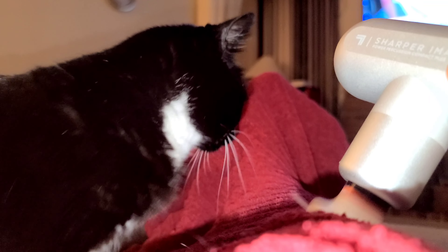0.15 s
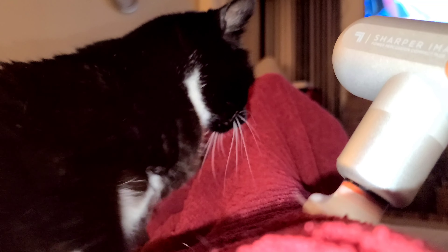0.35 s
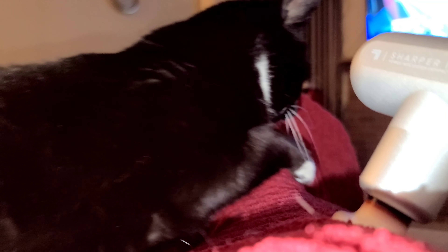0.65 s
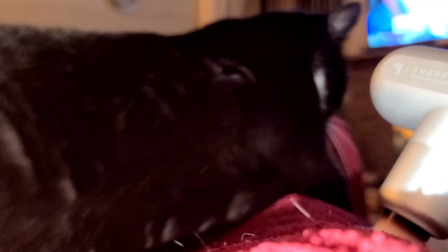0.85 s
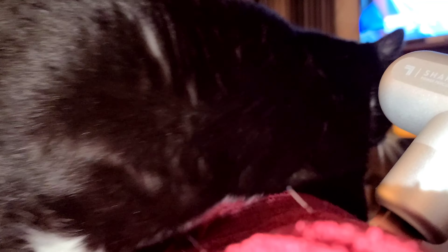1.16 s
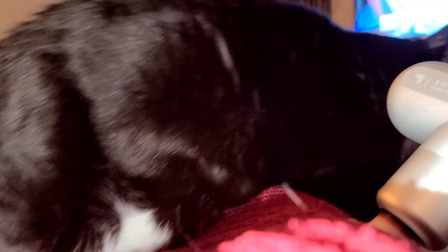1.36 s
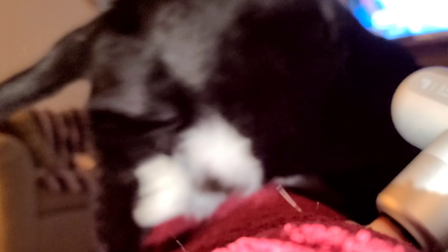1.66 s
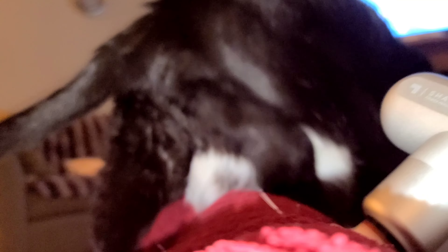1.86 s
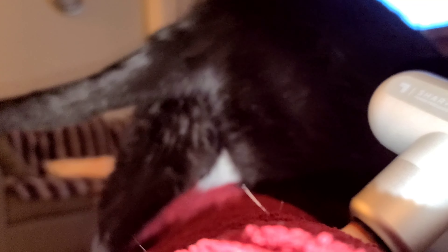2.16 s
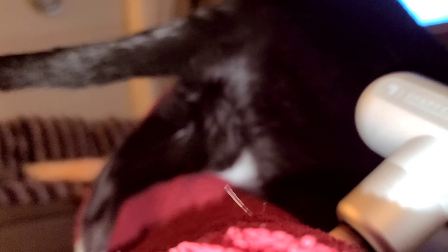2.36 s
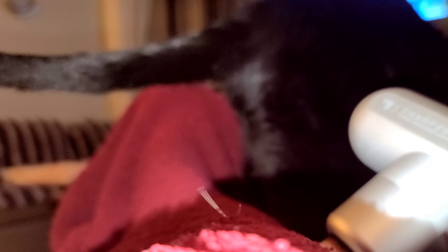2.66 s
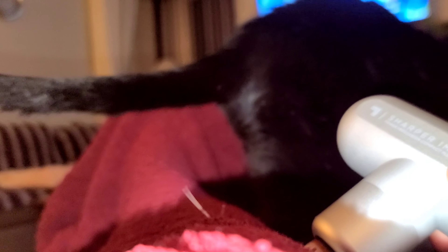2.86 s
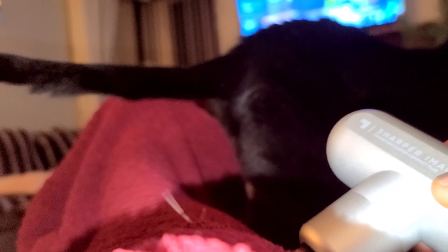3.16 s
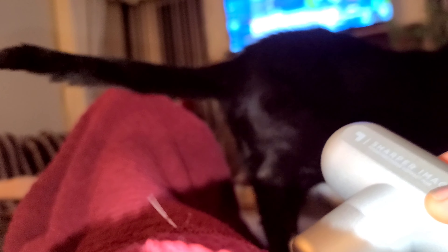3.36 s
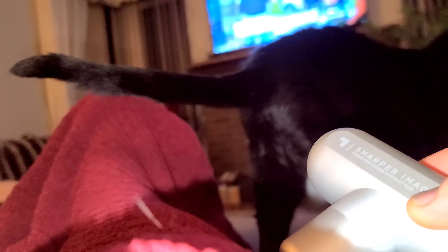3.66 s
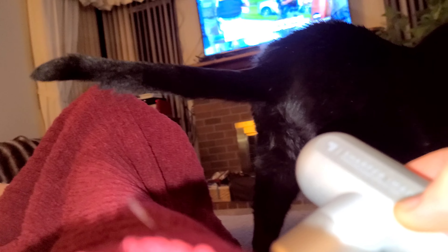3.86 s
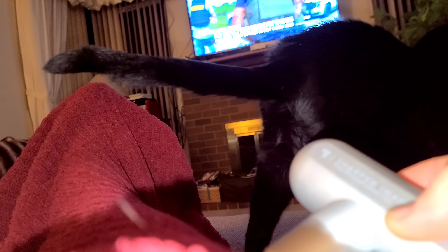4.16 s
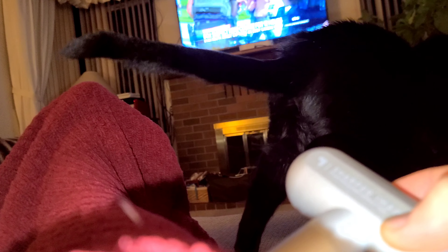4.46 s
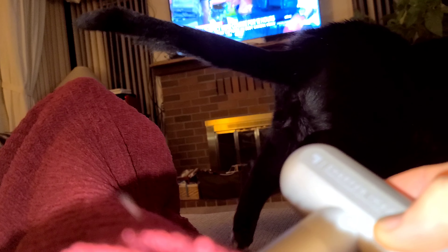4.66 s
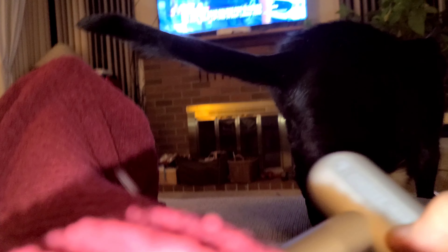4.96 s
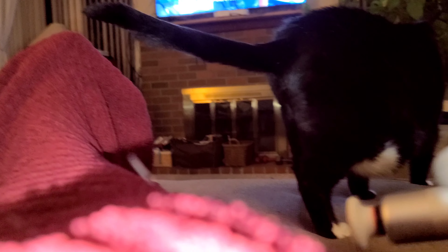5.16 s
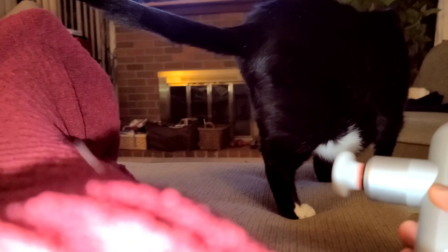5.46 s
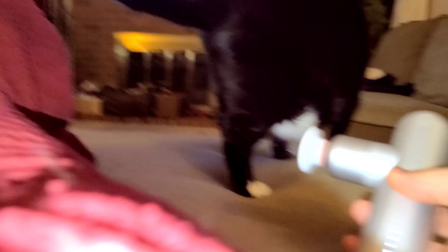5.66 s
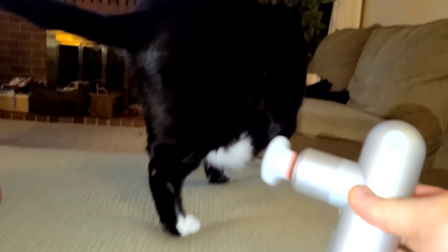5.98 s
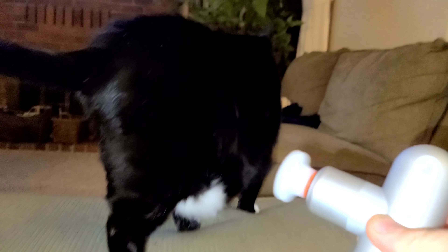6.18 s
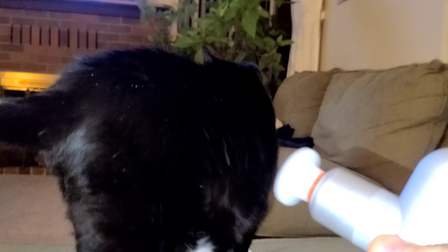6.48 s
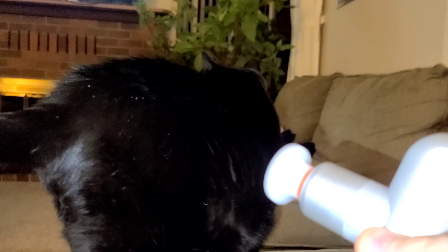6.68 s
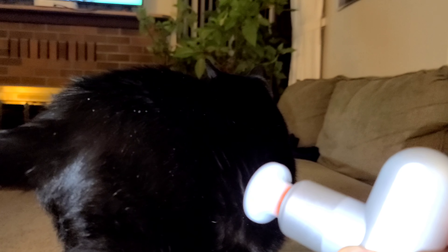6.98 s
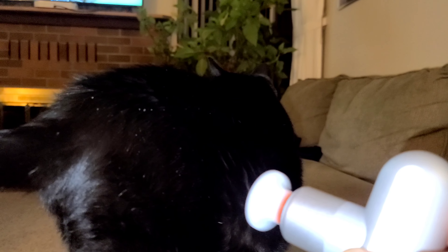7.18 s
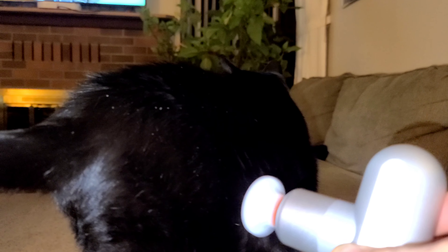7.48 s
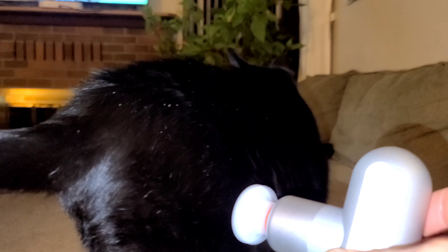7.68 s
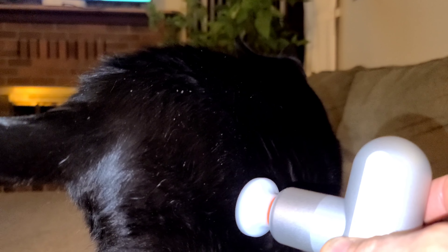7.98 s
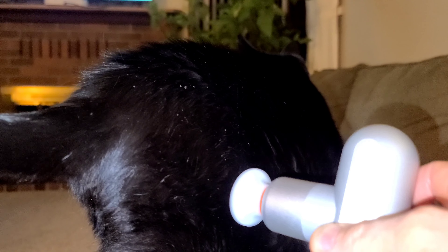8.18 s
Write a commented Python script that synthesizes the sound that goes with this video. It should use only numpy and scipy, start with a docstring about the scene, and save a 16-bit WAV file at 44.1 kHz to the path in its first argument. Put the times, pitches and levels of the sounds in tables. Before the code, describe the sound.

Close motor drone of a massage gun pressed on a blanketed leg, knocking and buzzing, then running freer and slightly higher after lifting, with clicks.

```python
"""Massage gun, pressed and lifted

A massage gun runs close to the microphones in a living room, on a blanket-covered leg, then lifts towards a cat.
Crank-locked tones and struck modes make its drone and knocks, 47 to 50 strokes a second; the motor's buzz and
rasp are coloured noise that repeats each turn, its whine a stack of tones. It runs faster once free.
Filtered noise is the rustling cloth and quiet room; struck modes give a sharp click and dull handling ticks."""
import sys
import numpy as np
from scipy import signal
from scipy.fft import rfft, irfft, next_fast_len
from scipy.io import wavfile

SR = 44100
rng = np.random.default_rng(int(sys.argv[2]) if len(sys.argv) > 2 else 0)


def materialize(psi):
    """Save the field psi as 16-bit PCM at rate SR to the path in sys.argv[1].

    A 1-D psi becomes a single channel; in a 2-D psi each row is a channel.
    """
    bounded = np.clip(np.atleast_2d(psi).T, -1, 1)
    quanta = np.round(bounded * 32767).astype(np.int16)
    wavfile.write(sys.argv[1], SR, quanta)


N = 367353
TIME = np.arange(N) / SR

# motor speed, which sags under load: time_s, strokes_per_s
SPEED = [(0, 48.329), (0.72, 48.757), (0.92, 47.526), (1.25, 46.616), (1.8, 47.262), (2.2, 46.95),
         (2.75, 47.661), (4.98, 47.13), (5.1, 49.7), (5.2, 50.276), (8.33, 50.333)]
FREE_STROKES_PER_S = 50.33
FULL_LOAD_SAG_PER_S = 2.865   # strokes per s lost when the head is fully pressed down

# spells of the grip: start_s, end_s, attack_s, release_s
THROB = (0, 0.674, .05, 0.295)   # the loosely held gun shakes the leg
TIPPED = (4.31, 5.02, 0.963, 0.0145)   # tipped on to the edge of its head
STRAIN = (4.25, 4.61, 0.067, 0.116)   # the bearing is loaded sideways
LOOSE = (0.157, 0.888, 0.079, 0.053)   # the head is not yet seated
LIFTED = (5.1, 5.784, 0.037, 0.234)   # just lifted, the free piston clacks harder
SING = (2.147, 4.68, 0.083, 0.047)   # the shell's ringing shifts to its highest band

# near-field stroke tone at the two microphones: time_s, left_db, right_db, left_lag_turns
DRONE = [(0.0, -36.1, -33.9, 0.14), (0.7, -38.4, -35.1, 0.13), (1.4, -37.9, -33.5, 0.37),
         (2.5, -39.2, -34.4, 0.38), (3.5, -39.3, -39.0, 0.14), (4.9, -34.3, -39.4, 0.23),
         (5.15, -41.3, -38.5, 0.04), (5.7, -45.7, -41.1, 0.04), (6.6, -41.5, -39.7, -0.0),
         (8.33, -40.6, -36.1, -0.03)]
# low overtones of the stroke: time_s, second_db, third_db, fifth_db, left_minus_right_db
OVERTONES = [(0, -44, -47.5, -63.5, -7.5), (.58, -42.5, -53, -55.5, -12), (.88, -59.5, -60.5, -62.5, 0.5),
             (1.05, -53.5, -52, -59, -8), (1.3, -50.5, -52, -59.5, 2), (1.75, -48.5, -55, -61.5, 3),
             (2.15, -58, -54, -64.5, 7), (2.45, -51.5, -54.5, -65.5, 2), (3.05, -54.5, -53, -61, -9),
             (3.5, -56, -60, -74.5, -6), (3.85, -63, -63.5, -85.5, -16), (4.25, -56.5, -61, -85.5, -18.5),
             (4.85, -53.5, -67.5, -83.5, -20.5), (5.15, -60, -54, -66.5, -5),
             (6.3, -61.5, -57.5, -87.5, -4.5), (8.33, -57.5, -56.5, -72.5, -1)]
# fourth overtone, the body of the hum: time_s, level_db
FOURTH = [(0, -64.5), (1.1, -67), (2.1, -66.5), (2.55, -57.5), (3.15, -62.5), (3.8, -75.5), (4.9, -82.5),
          (5.2, -73.5), (8.33, -78)]
OVERTONE_WAVER_DB = 1.8   # under full load

# head bouncing on every second stroke, gently and then hard: start_s, end_s, level_db
BOUNCES = [(0, .29, -36), (.38, 0.567, -24.5), (.62, .63, -22.5)]
BOUNCE_EDGES_S = (0.085, 0.014)   # attack, release; likewise for the other edges
BOUNCE_CRACK_DB = -21.5   # the casing's slap in each bounce
# resonances of a bounce: mode_hz, level_db, t60_s
BOUNCE_MODES = [(73.9, -7, 0.162), (133, -3, 0.0117), (416, -1.5, 0.00582), (770, -6, 0.00684),
                (1240, -6, 0.00188)]
# loose head chattering once a stroke while it runs free: start_s, end_s, level_db
CHATTERS = [(6.3, 6.7, -51), (6.77, 7.02, -44), (7.1, 8.33, -48)]
CHATTER_EDGES_S = (.05, 0.061)
# resonances of the chattering head: mode_hz, level_db, t60_s
CHATTER_MODES = [(1170, -3, 0.017), (1324, 0.5, 0.0121)]
# piston knocking under load: start_s, end_s, level_db
KNOCKS = [(1.5, 1.68, -33), (2.03, 2.14, -32), (2.25, 2.48, -32.5)]
KNOCK_EDGES_S = (0.268, 0.452)
# how squarely the knock lands, which makes it bright: time_s, hardness_0_to_1
HARDNESS = [(1.2, 0.65), (1.5, 0.92), (1.78, 0.52), (2.08, 0.91), (2.3, 0.79), (2.7, 0.47)]
# resonances of the piston knock: mode_hz, level_db, t60_s
PISTON_MODES = [(224.6, -11, 0.0278), (392, -1.5, 0.01742), (528, -1.12, 0.01098), (864, -0.5, 0.00853),
                (1140, -4.5, 0.0039)]
# resonances of the end-of-travel clack: mode_hz, level_db, t60_s
CLACK_MODES = [(244.1, -6.5, 0.0489), (377.7, 2, 0.01318), (564, 1, 0.00863), (865.5, -9, 0.0148)]

# Pairs are (running free, full load) in dB; the other levels are what each grip spell adds.
CLACK_DB, CLACK_THROB_DB, CLACK_TIPPED_DB, CLACK_LIFTED_DB = (-53.5, -47.5), 11.5, -16, 6.5
BUZZ_DB, BUZZ_THROB_DB, BUZZ_TIPPED_DB = (-69, -61.5), 6.5, 1
RASP_DB, RASP_STRAIN_DB, RASP_SING_DB = (-63, -61), 5.5, -2.5
LOW_RING_DB, LOW_RING_STRAIN_DB, LOW_RING_THROB_DB, LOW_RING_SING_DB = (-72, -64.5), 6.5, -6.5, -1.5
LOW_RING_TIPPED_DB = -3
MIDDLE_RING_DB, MIDDLE_RING_TIPPED_DB, MIDDLE_RING_THROB_DB = (-79, -63.5), -11, -3
HIGH_RING_DB, HIGH_RING_SING_DB = (-75.5, -68.5), 5
LOW_RING_WAVER_DB = 1.3
LOW_RING_PULSING = .12   # depth of the swell in the low ring, twice a turn
FREE_RASP_FOLLOWS = 0.58   # share of the whine's turning that rasp, low and high ring follow when free
# tone of the drive's buzz: band_hz, relative_level_db
BUZZ = [(150, -5.5), (330, 4), (450, -3), (620, -2), (800, -3), (1080, -9), (1340, 3), (1650, -21),
        (2400, -29)]
# tone of the rasp under load: band_hz, relative_level_db
RASP_LOADED = [(1600, -15), (2400, -27.5), (3300, -10), (3750, 10), (4000, 4.5), (4230, 10.5), (4480, 0),
               (4720, 7.5), (5400, -7.5), (6300, -6.5), (6850, -15), (9500, -45.5), (12500, -5.5),
               (16000, -19.5)]
# tone of the rasp running free: band_hz, relative_level_db
RASP_FREE = [(1600, 6.5), (2400, 4), (2900, 16), (3500, 5), (3900, 15), (4250, -0.5), (5200, 6.5),
             (6000, 3), (6800, -9.5), (8000, 4.5), (9800, -22.5), (12500, -1), (16000, -28.5)]

# motor tones: multiple_of_stroke_rate, loaded_relative_db, free_relative_db
WHINE = [(7, -16, -2), (9, -18, -5), (11, -20, -7), (13, -20, -10), (15, -20, -14), (17, -12, -14),
         (19, -18, -15), (20, -1.5, -12), (21, -7, -16), (24, -24, -12), (25, -26, -10), (28, -22, -12),
         (29, -11, -24), (30, 2.3, 2.5), (31, -4, -22), (59, -11, -26), (60, -14, -14), (61, -13, -30),
         (75, -28, -11), (80, -21, -12), (89, -13, -34), (90, -16, -23), (91, -16, -36), (99, -15, -32),
         (120, -20, -30), (150, -24, -14)]
# whine level as the gun turns towards the microphones and away: time_s, relative_level_db
FACING = [(0, -3.5), (0.7, -6), (1.2, -9), (2.3, -6.5), (2.8, -2), (4.0, -4.5), (5.0, -4), (5.09, -1),
          (5.17, -4.5), (5.35, -13.5), (5.9, -7.5), (6.2, -1.5), (8.33, -2.5)]
WHINE_DB = -60   # reference for the two relative levels above
LOOSE_ORDER, LOOSE_DB = 20, 8   # the tone that swells while the head is not seated, and its lift

# head scuffing the blanket on each stroke: start_s, end_s, level_db
SCUFFS = [(0, .75, -55), (.9, 2.6, -61), (2.7, 4.7, -64.5), (5.12, 5.16, -61.5)]
SCUFF_EDGES_S = (0.024, 0.208)
SCUFF_SHARPNESS = 0.39   # how narrowly each scuff is bunched within the stroke
# tone of the scuff: band_hz, relative_level_db
SCUFF = [(1500, -3), (3200, -2), (4600, 6), (6600, 2.5), (7800, 0.5), (9500, -6.5), (12000, -1.5),
         (16000, -7.5)]
# sliding cloth: start_s, end_s, level_db
SLIDES = [(5.52, 5.57, -52), (5.73, 5.77, -50.5), (5.97, 6.17, -54.5)]
SLIDE_EDGES_S = (0.1015, 0.0288)
SLIDE_FLUTTER_DB = 1.8
# tone of the sliding cloth: band_hz, relative_level_db
CLOTH = [(60, 2.5), (150, 3), (300, 6.5), (565, 2), (1200, -1), (1800, -4.5), (2800, -4.5), (4900, -12.5),
         (5900, -11.5), (12000, -21), (16000, -24.5)]
# the weave catches and rubs: start_s, end_s, attack_s, release_s
RUB = (5.925, 6.15, 0.064, 0.0087)
RUB_DB, RUB_CATCHES_PER_S = -53.5, 3300
# tone of the grainy rub: band_hz, relative_level_db
RUB_SPECTRUM = [(300, -7), (1200, -4), (2100, -3.5), (2800, 5), (3400, -0.5), (4900, -7), (5900, -5),
                (8000, -10), (12000, -16), (16000, -20)]

# head cracking down, then slipping and slapping on every stroke: time_s, level_db, contact_hz
SLAPS = [(.6618, -26, 2600), (.6642, -35, 1900), (.6826, -35, 1650), (.7030, -30, 1800),
         (.7235, -29.5, 1800), (.7440, -31.5, 1800), (.7646, -32, 1600), (.7853, -33.5, 1500),
         (.8059, -35, 1500), (.8267, -37, 1400), (.8476, -43, 1300)]
# resonances of the casing's slap: mode_hz, level_db, t60_s
SLAP_MODES = [(501, -1.5, 0.0119), (890, 1.8, 0.00723), (1281, -1.545, 0.0123)]
# soft bumps on the leg: time_s, level_db, contact_hz
BUMPS = [(4.02, -41, 200), (5.075, -33, 263), (5.68, -28.5, 263), (5.803, -28.5, 265.3)]
# touches that land on a hard edge: time_s, level_db, contact_hz
EDGES = [(5.412, -40, 12000), (5.8407, -31, 12000), (6.243, -44, 12000), (6.7493, -46, 12000),
         (7.5024, -45.5, 12000), (7.767, -44.5, 12000)]
# resonances of that hard edge: mode_hz, level_db, t60_s
EDGE_MODES = [(4490, -4.5, 0.0038), (6800, -13.5, 0.00175), (12000, -10, 0.00103)]

# sharp click: time_s, level_db, contact_hz
CLICK = [(5.8406, -15, 4700)]
# click resonances, unequal at the two microphones: mode_hz, level_db, t60_s, left_minus_right_db
CLICK_MODES = [(217, 0, 0.00686, -9.5), (535, -13, 0.0357, -10), (1076, -1, 0.00743, 5),
               (1803, -5.5, 0.00597, 7), (2320, -22.5, 0.0039, 9), (3017, -2.5, 0.00714, 11),
               (3834, -6.5, 0.00282, 11)]
# dull handling ticks: time_s, relative_level_db, contact_hz
TICKS = [(1.502, -43, 2000), (2.863, -42.5, 2000), (2.884, -38.5, 2520), (5.412, -37, 3000),
         (5.437, -43.5, 3000), (5.801, -32, 3000), (5.881, -40.5, 2500), (6.061, -38, 1200),
         (6.7493, -22, 3500), (7.0392, -23, 2200), (7.5021, -22, 3900), (7.5974, -26, 2400),
         (7.9026, -23.5, 2300), (8.315, -37, 1500)]
# tick resonances, unequal at the two microphones: mode_hz, level_db, t60_s, left_minus_right_db
TICK_MODES = [(272, -12.5, 0.0175, 3.5), (415.6, 3, 0.0152, 3), (531, 2, 0.0134, 8),
              (647, -16, 0.0088, 6.5), (737, -7, 0.0166, 7.5), (1036, -6.5, 0.0095, 6),
              (1500, -30, 0.005, 6), (2283, -7, 0.00464, 10.5)]
# small squeak of the grip: time_s, length_s, pitch_hz, level_db
SQUEAK = (6.953, .004, 1660, -53)

# tone of the quiet room: band_hz, relative_level_db
ROOM = [(20, -22.5), (45, 8), (70, 5.5), (120, -3.5), (250, -11.5), (600, -13), (1500, -17.5), (4000, -39),
        (16000, -34)]
# faint steady tone, fading out after five seconds: start_s, end_s, attack_s, release_s
ROOM_TONE = (0.5, 5, .1, 0.06)
ROOM_TONE_HZ, ROOM_TONE_DB = 588, -71.5
CUTOFF_HZ = 15900


def from_db(db):
    """Decibels to gain."""
    return 10 ** (np.asarray(db) / 20)


def rms_one(x):
    """Scale to unit rms."""
    return x / np.sqrt(np.mean(x ** 2) + 1e-20)


def in_time(rows):
    """Each column of a curve, interpolated at every sample."""
    s, *columns = np.transpose(rows)
    return [np.interp(TIME, s, column) for column in columns]


def spell(start, end, attack, release):
    """Swells to 1 at the start, holds, and dies away after the end."""
    rise = np.minimum(TIME - start, 0) / attack
    fall = np.maximum(TIME - end, 0) / release
    return np.exp(rise - fall)


def spells(rows, edges):
    """The gain of a run of spells that share their attack and release."""
    return np.max([from_db(db) * spell(start, end, *edges) for start, end, db in rows], axis=0)


def under_load(levels_db, load):
    """A level in dB between its free and its fully loaded value."""
    free_db, loaded_db = levels_db
    return free_db + load * (loaded_db - free_db)


def colour(x, spectrum):
    """Shape a sound by a spectrum that is shut beyond its ends; rms 1."""
    hz, db = np.transpose(spectrum)
    size = next_fast_len(N)
    log_hz = np.log(np.arange(size // 2 + 1) * SR / size + 1e-9)
    gain = from_db(np.interp(log_hz, np.log(hz), db, left=-200, right=-200))
    return rms_one(irfft(rfft(x, size) * gain, size)[..., :N])


def drift(rate_hz):
    """Slow random wander of rms 1: noise at 200 points a second through a two-pole smoother."""
    noise = rng.standard_normal(int(TIME[-1] * 200) + 400)
    r = np.exp(-2 * np.pi * rate_hz / 200)
    slow = signal.lfilter([1], [1, -2 * r, r * r], noise)[398:]   # drop the settling
    return np.interp(TIME * 200, np.arange(len(slow)), rms_one(slow))


def pan(db):
    """Left and right gains for a left-minus-right level difference."""
    return from_db(np.array([[.5], [-.5]]) * db)


def spread(pair, alike):
    """Two unrelated signals as left and right with a given likeness."""
    alike = np.clip(alike, -1, 1)
    middle = np.sqrt((1 + alike) / 2) * pair[0]
    side = np.sqrt((1 - alike) / 2) * pair[1]
    return middle + side * np.array([[1], [-1]])


def ports(x, side_db, lag_s):
    """A source at the two microphones: louder on one side; a positive lag is later on the right."""
    return np.array([x, np.interp(TIME - lag_s, TIME, x)]) * pan(side_db)


def ring(clicks, modes, contact_hz):
    """Clicks, softened by the contact, set damped sines ringing with alternating signs."""
    force = signal.sosfilt(signal.butter(4, contact_hz, fs=SR, output="sos"), clicks + 1e-18)
    out = 0
    for k, (hz, db, t60) in enumerate(modes):
        r = np.exp(-np.log(1000) / (t60 * SR))
        w = 2 * np.pi * hz / SR
        mode = signal.lfilter([0, np.sin(w)], [1, -2 * r * np.cos(w), r * r], force)
        out = out + (-1) ** k * from_db(db) * mode
    return out


def taps(events, modes, lowest_hz):
    """Single touches, each as hard as its contact, that ring briefly, with the lows cut below lowest_hz."""
    out = np.zeros(N + SR)
    click = signal.unit_impulse(SR // 4)
    low_cut = signal.butter(2, lowest_hz, "high", fs=SR, output="sos")
    for s, db, contact_hz in events:
        at = round(s * SR)
        touch = ring(click, modes, min(contact_hz, .45 * SR))
        out[at:at + len(click)] += from_db(db) * signal.sosfilt(low_cut, touch)
    return out[:N]


def resonate(x, hz, width_hz):
    """A steep-sided resonance, one peak filter run twice; rms 1."""
    b, a = signal.iirpeak(hz, hz / width_hz, fs=SR)
    return rms_one(signal.lfilter(b, a, signal.lfilter(b, a, x)))


def strokes(turn, angle, uneven_db):
    """One click of uneven strength each time the crank passes an angle (in turns)."""
    at = np.flatnonzero(np.diff(np.floor(turn - angle)) > 0)
    clicks = np.zeros(N)
    clicks[at] = from_db(uneven_db * rng.standard_normal(len(at)))
    return clicks


def rubbing(turn, rough, size=4096):
    """Moving parts meet the same bumps on every turn; a share of the friction is new each time."""
    bumps = rng.standard_normal((4, size // 12))
    tracks = signal.resample(bumps, size, axis=1)[:, (turn % 1 * size).astype(int)]
    grip = drift(0.3006) * 1.174   # radians: the changing grip shifts which parts radiate
    repeating = rms_one(tracks[:2] * np.cos(grip) + tracks[2:] * np.sin(grip))
    rough = np.clip(rough, 0, 1)
    return np.sqrt(1 - rough) * repeating + np.sqrt(rough) * rng.standard_normal((2, N))


def drone(turn, load):
    """The shuttling mass gives a clean stroke tone; its low overtones swell and fade with the grip."""
    left_db, right_db, left_lag = in_time(DRONE)
    second_db, third_db, fifth_db, side_db = in_time(OVERTONES)
    fourth_db, = in_time(FOURTH)
    throb = spell(*THROB)
    swing = turn - .05 + .04 * throb   # the mass lags the crank, less so when loosely held
    crank = 2 * np.pi * (swing - np.array([[1], [0]]) * left_lag)
    tone = from_db([left_db, right_db]) * np.cos(crank)
    yielding = .06 * load - .035 - .04 * throb   # turns: the soft leg delays the push
    push = 2 * np.pi * (turn - yielding - np.array([[.3], [0]]) * left_lag)
    overtones = 0
    for order, db in enumerate([second_db, third_db, fourth_db, fifth_db], 2):
        waver_db = OVERTONE_WAVER_DB * load * drift(4.9)
        overtones = overtones - (-1) ** order * from_db(db + waver_db) * np.cos(order * push)
    return np.sqrt(2) * (tone + overtones * pan(side_db))


def piston(turn, load):
    """Contacts tied to the crank strike modes: bounces, chatter, knocks and end-of-travel clacks."""
    bounces = strokes(turn / 2, angle=0.04984, uneven_db=1.5) * spells(BOUNCES, BOUNCE_EDGES_S)
    bounce = ring(bounces, BOUNCE_MODES, contact_hz=2600)
    bounce = bounce + from_db(BOUNCE_CRACK_DB) * ring(bounces, SLAP_MODES, contact_hz=1200)

    chatters = strokes(turn, angle=.1, uneven_db=2.5) * spells(CHATTERS, CHATTER_EDGES_S)
    chatter = ring(chatters, CHATTER_MODES, contact_hz=1600)

    knocks = strokes(turn, angle=.89, uneven_db=.8) * spells(KNOCKS, KNOCK_EDGES_S)
    hard = np.clip(in_time(HARDNESS)[0], 0, 1)
    knock = ring(knocks * hard, PISTON_MODES, contact_hz=2000)
    knock = knock + ring(knocks * (1 - hard), PISTON_MODES, contact_hz=837)

    back_share = 1 - 0.72 * load   # pressing down softens the return end
    out_ends = strokes(turn, angle=.82, uneven_db=.6)
    back_ends = strokes(turn, angle=.31, uneven_db=.6)
    clack_db = (under_load(CLACK_DB, load) + CLACK_THROB_DB * spell(*THROB)
                + CLACK_TIPPED_DB * spell(*TIPPED) + CLACK_LIFTED_DB * spell(*LIFTED))
    clack = ring((out_ends - back_share * back_ends) * from_db(clack_db), CLACK_MODES, contact_hz=1191)

    return (ports(bounce + clack, side_db=-5.5, lag_s=-0.000191)
            + ports(chatter, side_db=1.5, lag_s=0.0001)
            + ports(knock, side_db=5, lag_s=-0.000242))


def motor(turn, load, facing_db):
    """Friction noise that repeats each turn makes the buzz and rasp, and rings three bands of the shell."""
    throb, tipped, strain, sing = spell(*THROB), spell(*TIPPED), spell(*STRAIN), spell(*SING)
    turned_db = FREE_RASP_FOLLOWS * (1 - load) * facing_db
    buzz_db = under_load(BUZZ_DB, load) + BUZZ_THROB_DB * throb + BUZZ_TIPPED_DB * tipped
    rasp_db = under_load(RASP_DB, load) + RASP_STRAIN_DB * strain + RASP_SING_DB * sing + turned_db
    low_db = (under_load(LOW_RING_DB, load) + LOW_RING_STRAIN_DB * strain + LOW_RING_THROB_DB * throb
              + LOW_RING_SING_DB * sing + LOW_RING_TIPPED_DB * tipped
              + turned_db + LOW_RING_WAVER_DB * drift(3.14))
    middle_db = (under_load(MIDDLE_RING_DB, load) + MIDDLE_RING_TIPPED_DB * tipped
                 + MIDDLE_RING_THROB_DB * throb)
    high_db = under_load(HIGH_RING_DB, load) + HIGH_RING_SING_DB * sing + turned_db

    crank_bumps = rubbing(turn, rough=.13)
    bearing_bumps = rubbing(turn, rough=.35)
    free_bumps = rubbing(turn, rough=0.9)
    shell_bumps = rubbing(turn, rough=.3)

    buzz = from_db(buzz_db) * spread(colour(crank_bumps, BUZZ), alike=0.77) * pan(0.18)
    loaded = from_db(-0.5) * load * spread(colour(bearing_bumps, RASP_LOADED), alike=-0.57) * pan(12.08)
    free = from_db(-1.0) * (1 - load) * spread(colour(free_bumps, RASP_FREE), alike=0.062) * pan(1.45)

    push = 1 + LOW_RING_PULSING * np.cos(4 * np.pi * (turn - .4))   # friction peaks twice a turn
    shell = from_db(low_db) * push * resonate(shell_bumps, hz=2810, width_hz=220)
    shell += from_db(middle_db) * resonate(shell_bumps, hz=5864, width_hz=560)
    shell += from_db(high_db) * resonate(shell_bumps, hz=7412, width_hz=493)
    return buzz + from_db(rasp_db) * (loaded + free) + shell * pan(8.81)


def whine(turn, load, facing_db):
    """The poles pass thirty times a stroke; the swinging load adds side tones, and each tone wavers."""
    port_phase = np.array([[0], [.17]])   # turns between the two microphones
    tones = 0
    for order, loaded_db, free_db in WHINE:
        waver_db = (1.25 + 0.6 * load) * drift(15.2)
        level = from_db(load * loaded_db + (1 - load) * free_db + waver_db)
        if order == LOOSE_ORDER:
            level = level * from_db(LOOSE_DB * spell(*LOOSE))
        tones = tones + level * np.cos(2 * np.pi * (order * turn + rng.random() + port_phase))
    return np.sqrt(2) * from_db(WHINE_DB + facing_db) * tones * pan(4.5)


def cloth(turn):
    """Noise scuffs once a stroke, slides as the gun is lifted, then dense random catches make a grainy rub."""
    stroke = rms_one(np.exp(SCUFF_SHARPNESS * np.cos(2 * np.pi * (turn - .6))))
    scuff_noise = colour(rng.standard_normal((2, N)), SCUFF)
    scuff = spells(SCUFFS, SCUFF_EDGES_S) * stroke * scuff_noise
    flutter = from_db(SLIDE_FLUTTER_DB * drift(36.3))
    slide = spells(SLIDES, SLIDE_EDGES_S) * flutter * colour(rng.standard_normal((2, N)), CLOTH)
    catches = (rng.random(N) < RUB_CATCHES_PER_S / SR) * rng.standard_normal((2, N))
    rub = spell(*RUB) * from_db(RUB_DB + 1.2 * drift(34)) * colour(catches, RUB_SPECTRUM)
    return scuff * pan(0.39) + (slide + rub) * pan(7.5)


def jolts():
    """The head slaps as it slips off, the leg takes a few soft bumps, and some touches snap."""
    slaps = ports(taps(SLAPS, SLAP_MODES, lowest_hz=450), side_db=-3.0, lag_s=-0.000098)
    bumps = ports(taps(BUMPS, BOUNCE_MODES, lowest_hz=54.7), side_db=-3.0, lag_s=-0.0001)
    snaps = ports(taps(EDGES, EDGE_MODES, lowest_hz=3000), side_db=9.0, lag_s=0.00005)
    return slaps + bumps + snaps


def handling(events, modes, lowest_hz, lag_s):
    """Touches close to the microphones: each mode has its own balance, and the right side hears it later."""
    left_modes = [(hz, db + lean / 2, t60) for hz, db, t60, lean in modes]
    right_modes = [(hz, db - lean / 2, t60) for hz, db, t60, lean in modes]
    left = taps(events, left_modes, lowest_hz)
    right = taps(events, right_modes, lowest_hz)
    return np.array([left, np.interp(TIME - lag_s, TIME, right)])


def squeak():
    """A brief stick-slip tone with its octave, under a bell-shaped swell."""
    s, length, hz, db = SQUEAK
    phase = 2 * np.pi * hz * TIME
    swell = np.exp(-((TIME - s) / length) ** 2)
    return from_db(db) * swell * (np.sin(phase) + 0.48 * np.sin(2 * phase))


def quiet_room():
    """Low coloured noise in partly alike channels, with a faint steady tone."""
    air = from_db(-53.5) * spread(colour(rng.standard_normal((2, N)), ROOM), alike=0.463)
    tone = np.sqrt(2) * from_db(ROOM_TONE_DB) * spell(*ROOM_TONE) * np.sin(2 * np.pi * ROOM_TONE_HZ * TIME)
    return air + tone


def scene():
    """The gun, the cloth and the handling over a quiet room."""
    speed, = in_time(SPEED)
    facing_db, = in_time(FACING)
    turn = np.cumsum(speed) / SR   # crank position in turns
    load = np.clip((FREE_STROKES_PER_S - speed) / FULL_LOAD_SAG_PER_S, 0, 1)   # 0 free, 1 fully pressed
    gun = drone(turn, load) + piston(turn, load) + motor(turn, load, facing_db) + whine(turn, load, facing_db)
    click = handling(CLICK, CLICK_MODES, lowest_hz=122, lag_s=.00005)
    ticks = from_db(-2.5) * handling(TICKS, TICK_MODES, lowest_hz=250, lag_s=0.000172)
    return gun + cloth(turn) + jolts() + click + ticks + squeak() + quiet_room()


def record(dry):
    """A steep elliptic low-pass cuts the top."""
    return signal.sosfilt(signal.ellip(10, .1, 80, CUTOFF_HZ, fs=SR, output="sos"), dry)


dry = scene()
out = record(dry)
materialize(out)
```